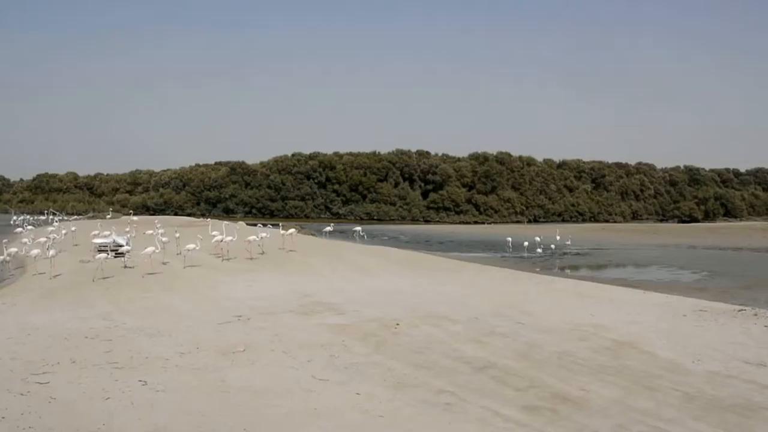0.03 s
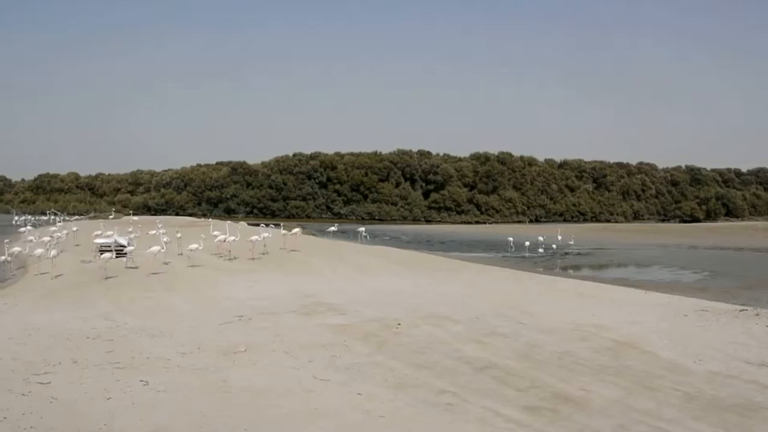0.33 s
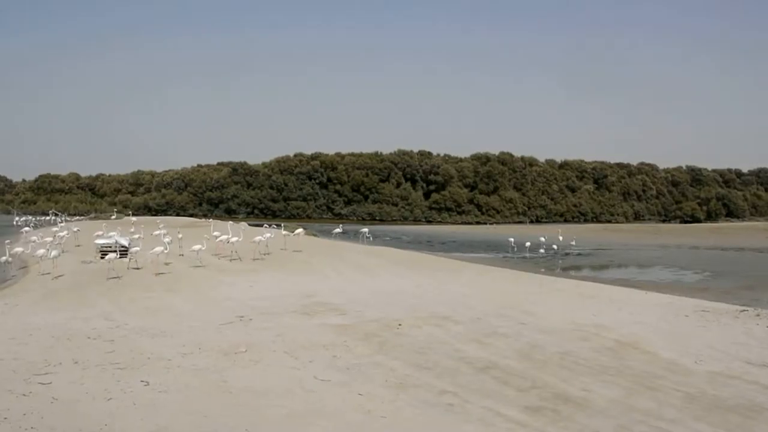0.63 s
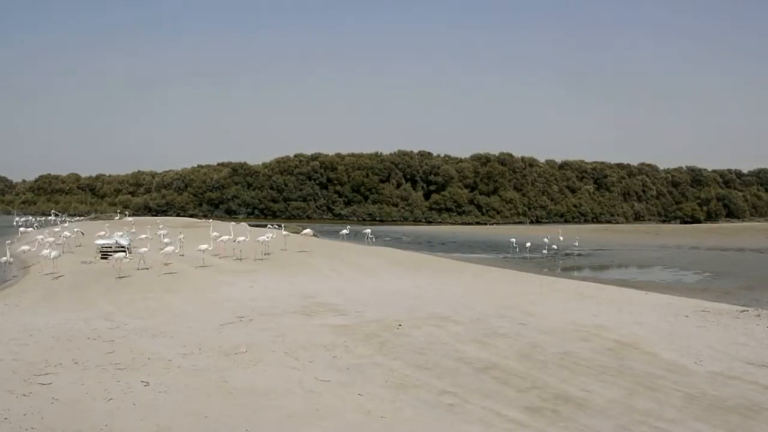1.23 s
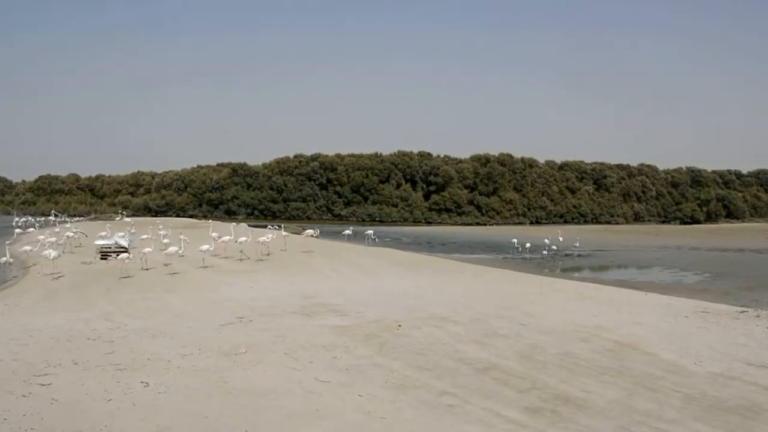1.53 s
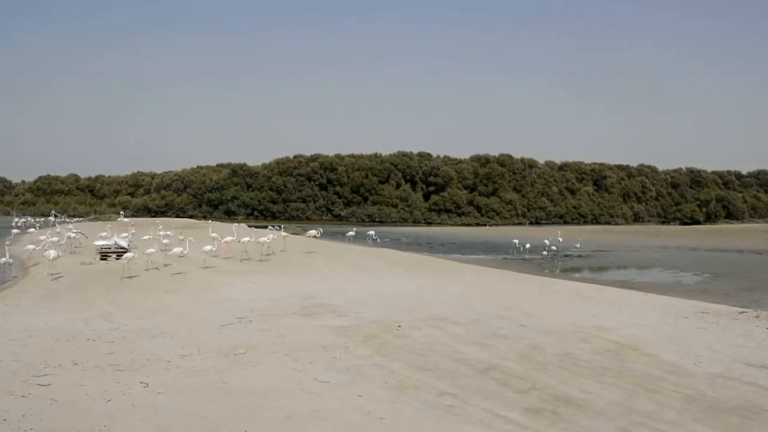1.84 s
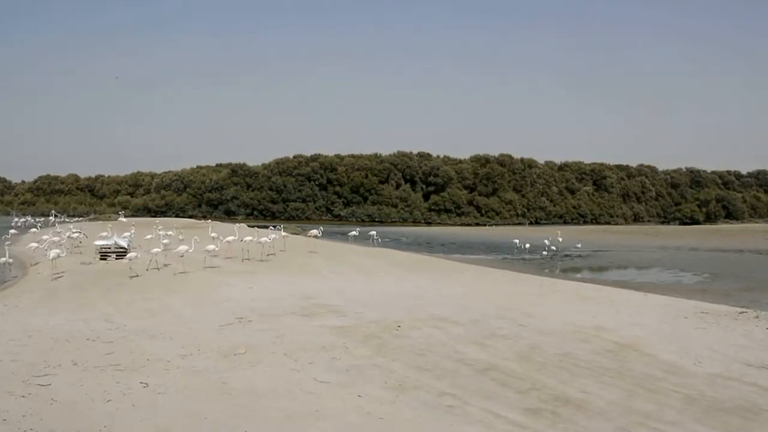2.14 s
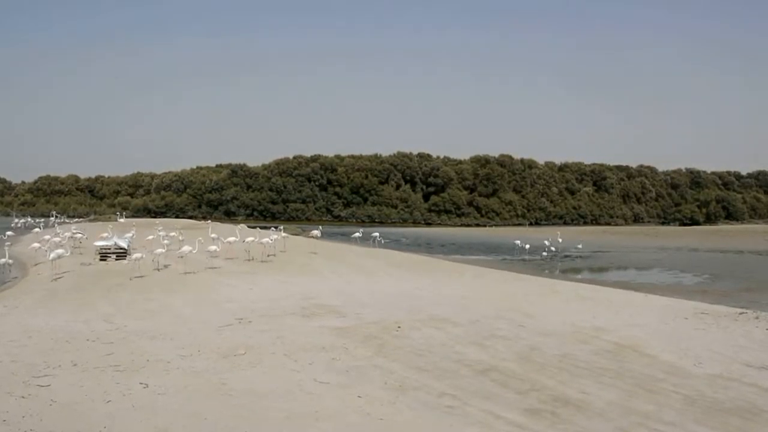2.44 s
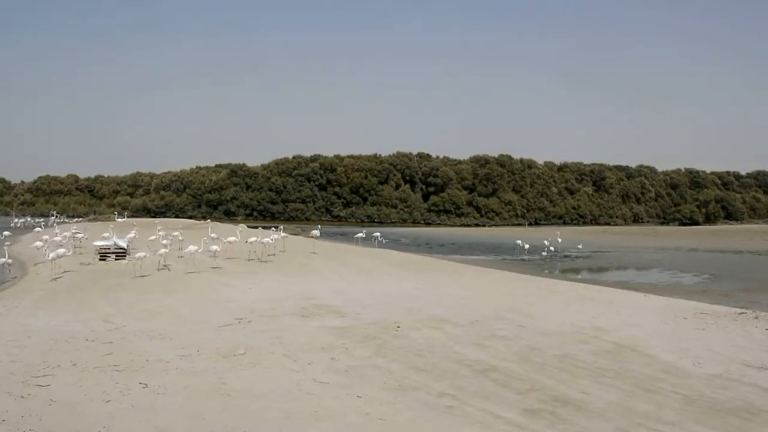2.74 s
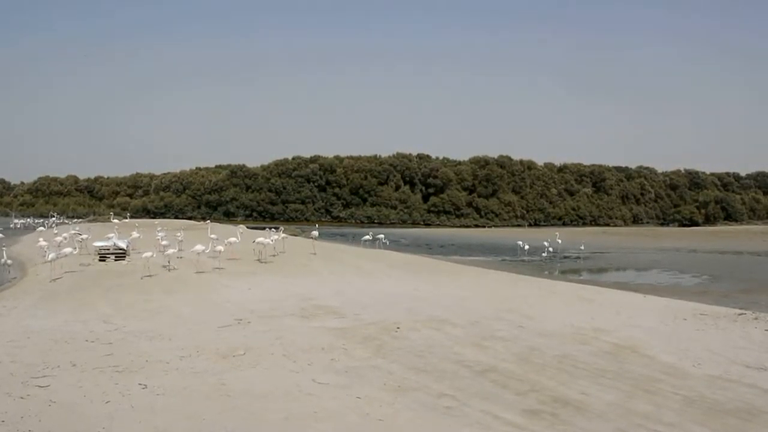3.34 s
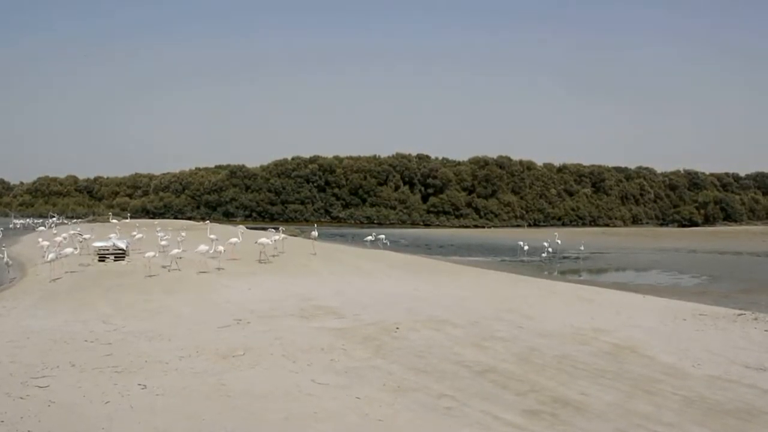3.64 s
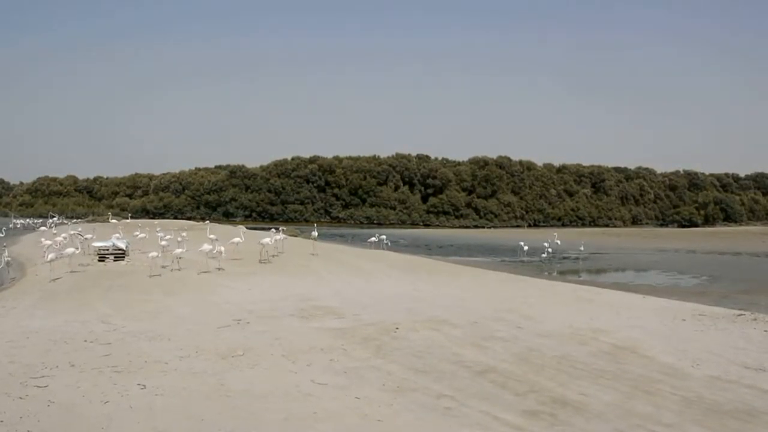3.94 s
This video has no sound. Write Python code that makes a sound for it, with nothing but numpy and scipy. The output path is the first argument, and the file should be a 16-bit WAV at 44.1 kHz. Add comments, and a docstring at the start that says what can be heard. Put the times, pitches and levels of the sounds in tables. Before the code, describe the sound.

A distant flamingo flock gabbles and grunts while gusty wind buffets the microphone.

```python
"""A flock of flamingos gabbles on a sandbank by a lagoon, heard from a distance.
A far murmur and wind rumble on two microphone ports start faintly, under a small bird's thin ticks.
Nearer birds grunt throughout, each grunt a rattle of rough throat pulses through nasal resonances.
From 0.6 s all is louder: eddies thump the ports, a few birds squeal and the hardest calls crackle.
Two faint, higher squeals come near the end."""
import sys
import numpy as np
from scipy import signal
from scipy.fft import rfft, irfft, next_fast_len
from scipy.io import wavfile

SR = 44100
rng = np.random.default_rng(int(sys.argv[2]) if len(sys.argv) > 2 else 0)


def int16_out(signal):
    """Quantize to a 16-bit WAV file."""
    q = np.round(np.clip(np.atleast_2d(signal).T, -1, 1) * 32767)
    wavfile.write(sys.argv[1], SR, q.astype(np.int16))


N = 176400


def amp(db):
    return 10 ** (np.asarray(db) / 20)


def unit_rms(x):
    return x / np.sqrt(np.mean(x ** 2) + 1e-20)


def curve_at(points, hz):
    """Interpolates (Hz, value) rows on a log-frequency axis."""
    knots_hz, values = np.transpose(points)
    return np.interp(np.log(hz + 1), np.log(knots_hz + 1), values)


def colour(x, points):
    """Filters by (Hz, dB) rows."""
    n = next_fast_len(len(x) + 1024)
    gain = amp(curve_at(points, np.fft.rfftfreq(n, 1 / SR)))
    return irfft(rfft(x, n) * gain, n)[:len(x)]


def add(mix, start_s, sound):
    """Mixes in place; negative starts move to zero."""
    part = mix[..., max(round(start_s * SR), 0):][..., :sound.shape[-1]]
    part += sound[..., :part.shape[-1]]


def resonate(x, hz, width_hz):
    """Double-pole resonance that can follow a moving frequency."""
    carrier = np.exp(2j * np.pi * np.cumsum(hz * np.ones(len(x))) / SR)
    pole = np.exp(-np.pi * width_hz / SR)
    baseband = signal.lfilter([(1 - pole) ** 2], [1, -2 * pole, pole * pole], x / carrier + 1e-18)
    return 2 * (carrier * baseband).real


def throat_pulses(length_s, rate_hz, wander_hz=0):
    """A rattle arching in rate and level. Returns noise bursts and a complex envelope for a ring."""
    attack_s, release_s, overhang_s, swell_db = 0.0077, 0.031, 0.018, 3
    rate_arch, jitter, shimmer_db = 0.06, 0.025, 1.14
    rise_s, decay_s, breath, roughness = 0.0015, 0.0063, 0.086, 0.53
    t = np.arange(0, length_s + overhang_s, 1 / SR)
    age = np.arange(700) / SR
    rise = (age / rise_s) ** 3
    shape = rise / (1 + rise) * np.exp(-(age / decay_s) ** 2)
    shape /= shape.max()
    common, *fresh_noises = rng.standard_normal((32, len(age)))
    scatter = rng.standard_normal((32, 4))
    bursts = breath * rng.standard_normal(SR // 2)[:len(t)]
    ring = np.zeros(len(t), complex)
    due_s = 0
    for fresh, (late, loud, phase, detune) in zip(fresh_noises, scatter):
        pulse = shape * amp(shimmer_db * loud)
        start_s = due_s + jitter * late / rate_hz
        add(bursts, start_s, pulse * (np.sqrt(roughness) * fresh + np.sqrt(1 - roughness) * common))
        add(ring, start_s, pulse * np.exp(2j * (phase + np.pi * wander_hz * detune * age)))
        arch = np.sin(np.pi * min(due_s / length_s, 1)) - 2 / np.pi
        due_s += 1 / (rate_hz * (1 + rate_arch * arch))
    edges = np.minimum(0.5 + 0.5 * t / attack_s, 1) * np.minimum((t[-1] - t) / release_s, 1)
    envelope = edges * amp(swell_db * np.sin(np.pi * t / t[-1]))
    return np.pad(bursts * envelope, (0, 256)), np.pad(ring * envelope, (0, 256))


# Murmur loudness. Each row: time in seconds, level in dB.
FLOCK_LEVEL = [(0, -64), (.19, -57.5), (.28, -42.5), (.6, -29.5), (1.1, -30), (1.7, -34.5), (2.0, -36),
               (2.4, -27), (2.61, -34), (2.75, -29.5), (3.0, -26.5), (3.26, -32), (3.45, -26.5),
               (3.62, -31.5), (3.85, -27.5), (4, -27)]
# Murmur spectrum. Each row: frequency in Hz, relative gain in dB.
FLOCK_COLOUR = [(100, -2.5), (550, -14), (800, -3), (1080, 4.5), (1450, -1.5), (1900, -4), (2450, -3.5),
                (3600, -16.5), (4600, -18), (6500, -30.5), (12000, -40.5), (15000, -70)]


def far_flock(grunts_per_s=16):
    """Many far birds grunt at random, merging to a gabble."""
    out = np.zeros(N)
    count = round(grunts_per_s * N / SR)
    for slot, (late, long, fast) in enumerate(rng.random((count, 3))):
        bursts, _ = throat_pulses(length_s=0.0908 + 0.12 * long, rate_hz=68 + 42 * fast)
        add(out, (slot + late - 1) / grunts_per_s, bursts)
    level_db = np.interp(np.arange(N) / SR, *np.transpose(FLOCK_LEVEL))
    return unit_rms(colour(out, FLOCK_COLOUR)) * amp(level_db)


# Wind at the ports. Each row: time in seconds, level in dB, left minus right in dB.
WIND_LEVEL = [(0.0, -64, -2), (0.26, -58.5, -5), (0.41, -35.5, 9.5), (0.46, -44.5, -9), (0.58, -20.5, 8),
              (0.63, -34.5, 13), (0.71, -21.5, -17), (0.8, -45, -21.5), (1.19, -32, -4.5),
              (1.35, -23, -16.5), (1.47, -23.5, 13.5), (1.55, -20.5, -5), (1.61, -24, 12), (1.7, -24.5, -2),
              (1.92, -30.5, -8), (2.0, -27, 13.5), (2.15, -22, -8), (2.3, -30, -3), (2.47, -19.5, 0),
              (2.62, -27, 4.5), (3.0, -20.5, -9.5), (3.2, -32.5, -12), (3.36, -22.5, -12.5),
              (3.41, -36, -2), (3.55, -21, 4), (3.68, -17, -6), (3.79, -25, 2), (3.88, -17.5, 3),
              (4.0, -30, 3)]
# Rumble spectrum. Each row: frequency in Hz, relative gain in dB.
WIND_COLOUR = [(35, -50), (70, -15), (120, -5.5), (190, -1), (300, -2), (480, -6), (700, -12),
               (1100, -25.5), (3000, -69)]


def wind_rumble(eddy_db=5, eddy_hz=51.7):
    """Lumpy low turbulence, independent at each port."""
    t = np.arange(N) / SR
    times_s, level_db, pan_db = np.transpose(WIND_LEVEL)
    lowpass = signal.butter(2, eddy_hz, fs=SR, output="sos")
    ports = []
    for side in (1, -1):
        eddies = unit_rms(signal.sosfilt(lowpass, rng.standard_normal(N)))
        turbulence = rng.standard_normal(N) * amp(eddy_db * np.clip(eddies, -2, 2))
        rumble = unit_rms(colour(turbulence, WIND_COLOUR))
        ports.append(rumble * amp(np.interp(t, times_s, level_db + side * pan_db / 2)))
    return np.array(ports)


# Nearer calls. Each row: start and length in seconds, pulse rate in Hz, low, nasal and upper
# resonances in Hz, nasal width in Hz, levels of low, nasal, upper, rasp and fizz in dB.
GRUNTS = [(0.029, 0.092, 104, 1084, 2200, 4400, 800, -51, -60, -66, -59.5, -73),
          (0.277, 0.097, 91, 1074, 2440, 4070, 800, -46, -47, -54, -47.5, -64),
          (0.354, 0.075, 85, 1041, 2410, 4300, 785, -35.5, -37, -40, -36.5, -55.5),
          (0.436, 0.094, 98, 959, 2600, 4470, 800, -35.5, -41.5, -47, -41, -54.5),
          (0.505, 0.062, 85, 1035, 2200, 4400, 800, -28.5, -35, -39.5, -32, -42.5),
          (0.589, 0.12, 84, 1077, 2250, 4360, 800, -28.5, -31.5, -39.5, -33.5, -49.5),
          (0.646, 0.11, 109, 1074, 2530, 4700, 800, -28.5, -35, -38.5, -37, -47),
          (0.761, 0.13, 136, 1098, 2430, 4270, 796, -30, -29, -41, -34.5, -46.5),
          (0.885, 0.12, 84, 1033, 2460, 4250, 800, -23.5, -34, -35, -32.5, -49),
          (1.006, 0.14, 88, 1086, 2330, 4200, 800, -23, -35.5, -32, -31, -44.5),
          (1.143, 0.06, 83, 1063, 2280, 4360, 800, -27, -39, -50, -45, -54.5),
          (1.298, 0.081, 96, 1070, 2300, 4220, 820, -23, -32, -41.5, -35.5, -47),
          (1.451, 0.1, 76, 1110, 2500, 4020, 800, -31.5, -36.5, -40, -38, -76),
          (1.575, 0.045, 76, 1038, 2250, 4130, 810, -29, -35.5, -42.5, -37, -53.9),
          (1.802, 0.05, 63, 1083, 2250, 4300, 800, -29, -35, -37.6, -34, -50.5),
          (1.876, 0.078, 71, 1065, 2340, 4370, 800, -36, -35, -48, -42.5, -61),
          (2.024, 0.14, 117, 1048, 2370, 4280, 830, -22.5, -29, -32, -27.5, -46),
          (2.112, 0.125, 92, 1037, 2320, 4460, 830, -22.5, -32.5, -31, -27, -41),
          (2.31, 0.11, 110, 1187, 2460, 4150, 444, -39, -27.5, -46.5, -37, -58),
          (2.414, 0.092, 85, 1067, 2480, 4550, 500, -25.5, -24, -33, -29, -44),
          (2.497, 0.046, 101, 1144, 2440, 4570, 450, -36, -28.5, -55, -43, -57),
          (2.653, 0.017, 60, 1095, 2230, 4400, 607, -34.5, -33.5, -42.5, -37, -54),
          (2.693, 0.063, 89, 1100, 2300, 4350, 700, -37, -40, -55, -42.5, -56),
          (2.757, 0.11, 98, 1082, 2440, 4180, 795, -28.5, -29, -36.5, -31.5, -47.3),
          (2.876, 0.074, 90, 1055, 2280, 4200, 597, -26.5, -29, -35.5, -33.5, -49.5),
          (2.941, 0.083, 87.5, 1052, 2300, 4300, 600, -20.5, -28.5, -32.5, -29, -45.5),
          (3.068, 0.15, 94.5, 1072, 2410, 4210, 800, -22.5, -28, -34.5, -31.5, -48),
          (3.292, 0.05, 66, 1138, 2420, 4400, 800, -29, -35, -43, -40, -49),
          (3.343, 0.14, 81.7, 1087, 2400, 4230, 750, -24.5, -29, -42.5, -37, -53),
          (3.49, 0.1, 91, 1070, 2400, 4300, 790, -29, -28.5, -42.5, -39, -50.5),
          (3.625, 0.14, 76, 1010, 2450, 4350, 790, -34.5, -37.5, -49, -41.5, -57.5),
          (3.752, 0.024, 66, 1044, 2300, 4230, 550, -30, -34.5, -55, -52, -62),
          (3.807, 0.16, 86.5, 1080, 2400, 4330, 825, -30, -30, -47.5, -38.5, -53.5),
          (3.969, 0.06, 72, 1067, 2330, 4260, 800, -29.5, -27.5, -44, -34.5, -53)]
# Throat rasp of a bird with its upper resonance at RASP_UPPER_HZ.
# Each row: frequency in Hz, relative gain in dB.
RASP_COLOUR = [(600, -33), (1500, -35.5), (2600, -2), (3000, 0.5), (3350, 6.5), (3750, 0), (4200, -7),
               (4700, -14), (5100, -5.5), (5400, -9), (5700, -2), (6500, -22.5), (9000, -59)]
RASP_UPPER_HZ = 4446
# Throat fizz above the rasp. Each row: frequency in Hz, relative gain in dB.
FIZZ_COLOUR = [(4500, -21), (6200, 3.5), (7100, 10), (8200, 5), (9100, 10), (9800, -1), (10800, 3),
               (12000, -1), (13400, -7), (14400, -26), (15500, -55)]


def grunts(clean_share=0.82, mouth_rise=0.018):
    """Each rattle rings three resonances, the top two rising slightly, with rasp and fizz."""
    out = np.zeros(N)
    for start_s, length_s, rate_hz, low_hz, nasal_hz, upper_hz, nasal_width_hz, *levels_db in GRUNTS:
        bursts, ring = throat_pulses(length_s, rate_hz, wander_hz=34.3)
        clean = unit_rms((ring * np.exp(2j * np.pi * low_hz * np.arange(len(ring)) / SR)).real)
        rough = unit_rms(resonate(bursts, low_hz, width_hz=346))
        low = np.sqrt(clean_share) * clean + np.sqrt(1 - clean_share) * rough
        glide = 1 + mouth_rise * np.linspace(-0.5, 0.5, len(bursts))
        nasal = resonate(bursts, nasal_hz * glide, nasal_width_hz)
        upper = resonate(bursts, upper_hz * glide, width_hz=1000)
        throat_scale = np.sqrt(upper_hz / RASP_UPPER_HZ)
        rasp = colour(bursts, [(hz * throat_scale, db) for hz, db in RASP_COLOUR])
        fizz = colour(bursts, FIZZ_COLOUR)
        for part, db in zip((low, nasal, upper, rasp, fizz), levels_db):
            add(out, start_s, amp(db) * unit_rms(part))
    return out


# A small bird's ticks. Each row: peak time in seconds, level in dB.
TICKS = [(.122, -44), (0.162, -45.5), (.236, -40)]
# Tick spectrum. Each row: frequency in Hz, relative gain in dB.
TICK_COLOUR = [(2500, -15), (5000, 2), (6500, 2), (9500, -3), (11500, -28), (15000, -40)]


def bird_ticks(decay_s=0.0025):
    """Thin ticks: high noise under sharp two-sided peaks."""
    t = np.arange(N) / SR
    envelope = sum(amp(db) * np.exp(-abs(t - peak_s) / decay_s) for peak_s, db in TICKS)
    return envelope * unit_rms(colour(rng.standard_normal(N), TICK_COLOUR))


# Eddies hitting a port. Each row: peak time in seconds, peak level in dB,
# left minus right in dB, fastest swing in Hz.
THUMPS = [(0.596, -10, -13, 673), (0.708, -10.5, -1, 514), (0.749, -17, -23, 560), (1.304, -14, -28, 400),
          (1.464, -8.5, 24, 488), (1.532, -12, -17, 397), (1.579, -14, 19, 537), (1.619, -10.5, 19, 620),
          (1.694, -10.5, -12, 726), (1.775, -10.5, 24, 360), (1.803, -7.5, -32, 516),
          (1.875, -9.5, -30, 650), (1.95, -13, -21, 417), (2.3, -11.5, -29, 493), (2.341, -13, -18, 400),
          (2.493, -12, -4, 396), (2.531, -10.5, -12, 424), (2.591, -10, 21, 679), (2.688, -14, -5, 518),
          (2.853, -5.5, -18, 559), (3.05, -9, -28, 512), (3.16, -6.5, -30, 612), (3.343, -17.5, -30, 520),
          (3.448, -14, 15, 628), (3.643, -10, -22, 633), (3.678, -12, -27, 544), (3.69, -11, 15, 617),
          (3.854, -11, 27, 553)]


def wind_thumps():
    """A strong eddy gives one fast pressure swing, with slower, weaker swings before and after."""
    core_half_cycles = 0.68
    flank_speed, flank_db, flank_s = 0.3904, -9.5, 0.0043
    out = np.zeros((2, N))
    t = np.arange(-SR // 50, SR // 50) / SR
    for (peak_s, db, pan_db, hz), phase in zip(THUMPS, rng.random(len(THUMPS))):
        core = 1 / (1 + (t * hz / core_half_cycles) ** 2)
        cycles = np.cumsum(hz * (flank_speed + (1 - flank_speed) * core)) / SR
        envelope = core ** 2 + amp(flank_db) * (1 - core ** 2) / np.cosh(t / flank_s)
        swing = envelope * np.sin(2 * np.pi * (cycles + phase))
        port_gains = amp([[pan_db / 2], [-pan_db / 2]])
        add(out, peak_s + t[0], amp(db) * port_gains / port_gains.mean() * swing)
    return out


# Higher voices. Each row: start and length in seconds, pulse rate in Hz,
# first and last resonance in Hz, level in dB.
SQUEALS = [(0.653, 0.1, 120, 2567, 2460, -25.5), (0.768, 0.06, 130, 2546, 2864, -29),
           (1.049, 0.03, 79, 4020, 4220, -32), (3.619, 0.088, 81, 4800, 5150, -48),
           (3.704, 0.024, 130, 5160, 5370, -43)]


def squeals():
    """Each throat pulse rings one narrow resonance that glides through the call."""
    out = np.zeros(N)
    for start_s, length_s, rate_hz, from_hz, to_hz, db in SQUEALS:
        _, ring = throat_pulses(length_s, rate_hz, wander_hz=71)
        glide_hz = np.linspace(from_hz, to_hz, len(ring))
        tone = (ring * np.exp(2j * np.pi * np.cumsum(glide_hz) / SR)).real
        add(out, start_s, amp(db) * unit_rms(tone))
    return out


# Crackle in the hardest calls. Each row: start and length in seconds, pulse rate in Hz, level in dB.
CRACKLES = [(0.673, 0.026, 93, -41.5), (2.156, 0.066, 93, -42.5), (3.377, 0.07, 86, -48.5)]
# Crackle spectrum. Each row: frequency in Hz, relative gain in dB.
CRACKLE_COLOUR = [(3000, -23), (11200, 4), (13400, -6), (15500, -50)]


def crackles(decay_s=0.0013, spread_db=3):
    """Hard-driven throat pulses snap shut, each with a short bright crack."""
    out = np.zeros(N)
    for start_s, length_s, rate_hz, db in CRACKLES:
        t = np.arange(0, length_s + 1 / rate_hz, 1 / SR)
        pulse_index, age = np.divmod(t, 1 / rate_hz)
        strength = amp(spread_db * rng.standard_normal(32))[pulse_index.astype(int)]
        envelope = strength * age * np.exp(-age / decay_s)
        cracks = envelope * rng.standard_normal(SR // 2)[:len(t)]
        add(out, start_s, amp(db) * unit_rms(colour(cracks, CRACKLE_COLOUR)))
    return out


# Scatter that differs between the ports. Each row: frequency in Hz, relative gain in dB.
DIFFUSE_COLOUR = [(4000, -6), (8000, -5), (13000, -8)]


def shore_scatter(birds, echo_db=-8.5, t60_s=0.2):
    """Sand and trees add a faint echo, partly different at each port."""
    t = np.arange(SR // 2) / SR
    tails = rng.standard_normal((2, len(t))) * amp(-60 * t / t60_s)
    tails *= amp(echo_db) / np.linalg.norm(tails, axis=1, keepdims=True)
    shared, difference = (signal.fftconvolve(birds, tail)[:N] for tail in tails)
    return birds + shared + np.array([[0.5], [-0.5]]) * colour(difference, DIFFUSE_COLOUR)


# Balance of the birds. Each row: frequency in Hz, left minus right in dB.
PORT_BALANCE = [(800, 0.5), (1160, 0.7), (1770, 1.5), (2600, 3), (4120, -0.5), (6290, -0.5), (7300, -3.5),
                (9000, 4), (12000, 3), (14600, -3)]
# Phase between the ports. Each row: frequency in Hz, lead of the left in radians.
PORT_PHASE = [(1000, 0.12), (4300, 0.2), (5000, 0.4), (6200, 0.52), (7400, 1.05), (7800, 1.84), (9600, 2.1),
              (10000, 0.56)]


def microphone_ports(birds):
    """The calls reach the two ports at different levels and phases."""
    hz = np.fft.rfftfreq(N, 1 / SR)
    left = amp(curve_at(PORT_BALANCE, hz) / 2) * np.exp(0.5j * curve_at(PORT_PHASE, hz))
    return irfft(rfft(birds) * np.array([left, 1 / left]), N)


def scene():
    """Birds arrive across the shore; wind acts directly on the ports."""
    birds = grunts() + far_flock() + squeals() + crackles() + bird_ticks()
    return microphone_ports(shore_scatter(birds)) + wind_rumble() + wind_thumps()


def record(dry):
    """Low cut, fast fade-in after a moment of silence, band limit."""
    low_cut_hz, high_cut_hz = 45, 15250
    silence_s, fade_s = 0.0346, 0.0027
    highpass = signal.butter(4, low_cut_hz, "high", fs=SR, output="sos")
    lowpass = signal.firwin(255, high_cut_hz, window=("kaiser", 9), fs=SR)
    fade_in = np.clip((np.arange(N) / SR - silence_s) / fade_s, 0, 1)
    return signal.oaconvolve(signal.sosfilt(highpass, dry) * fade_in, lowpass[None], "same")


dry = scene()
out = record(dry)
int16_out(out)
```